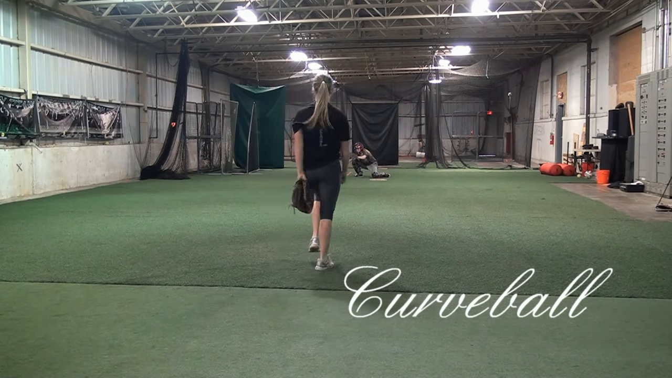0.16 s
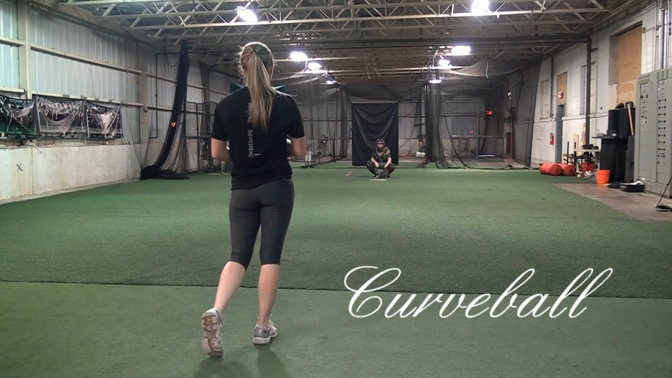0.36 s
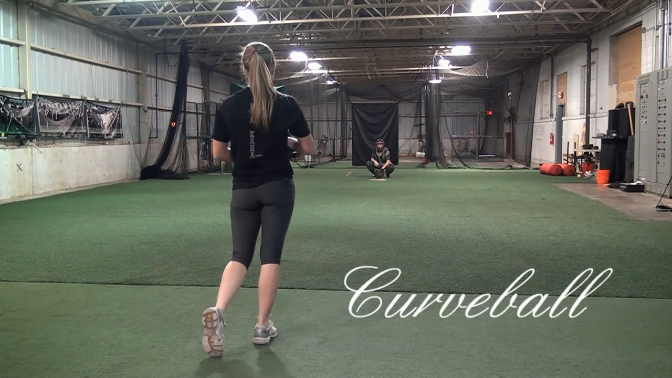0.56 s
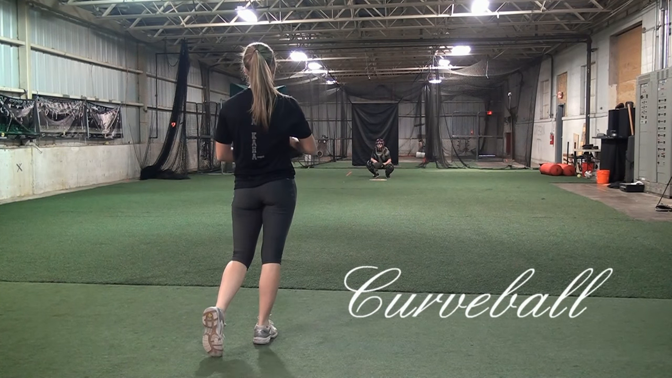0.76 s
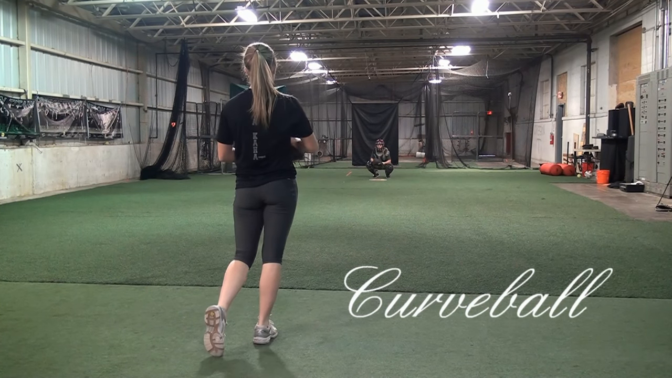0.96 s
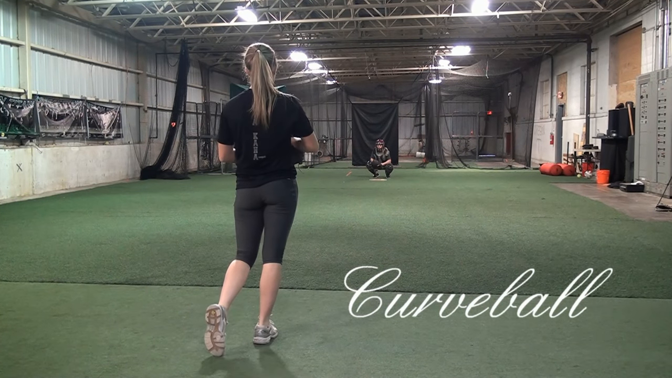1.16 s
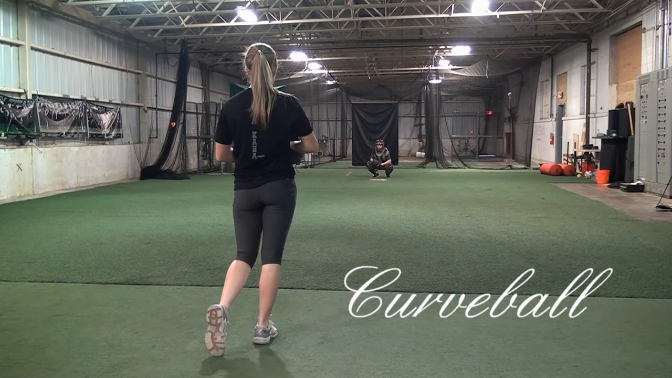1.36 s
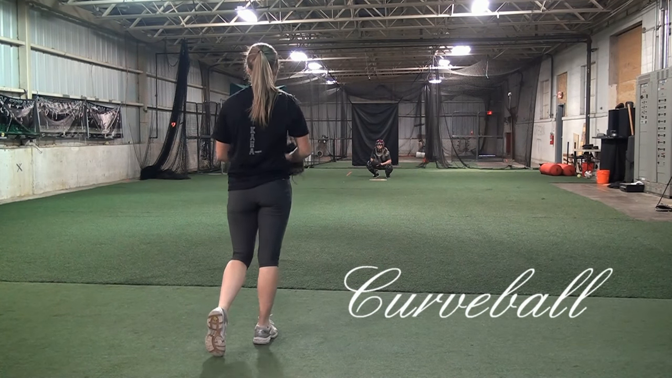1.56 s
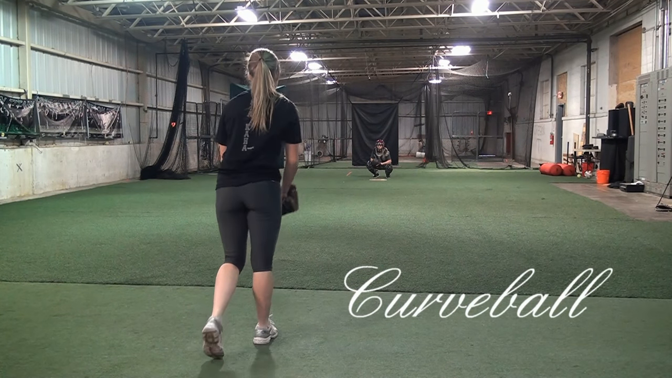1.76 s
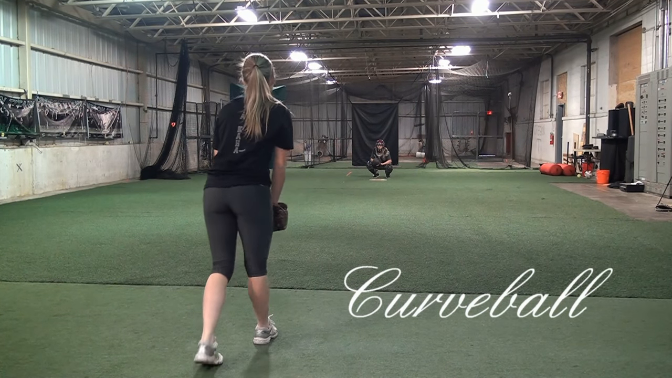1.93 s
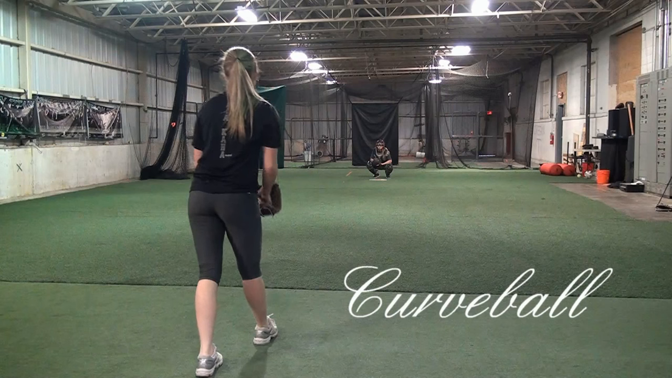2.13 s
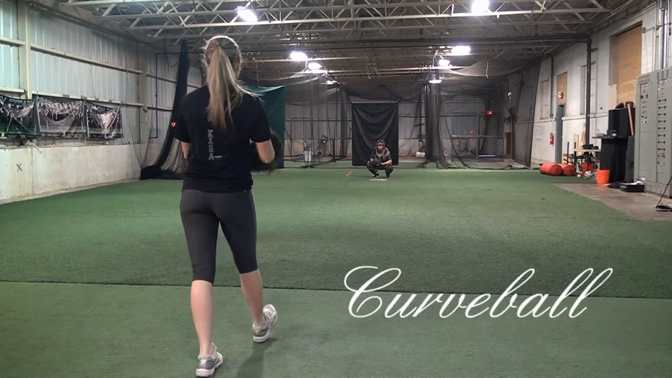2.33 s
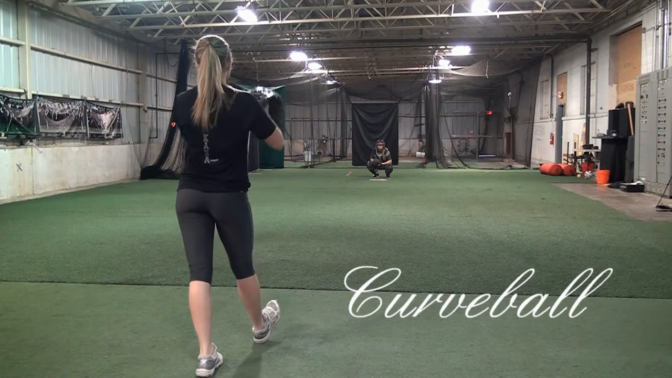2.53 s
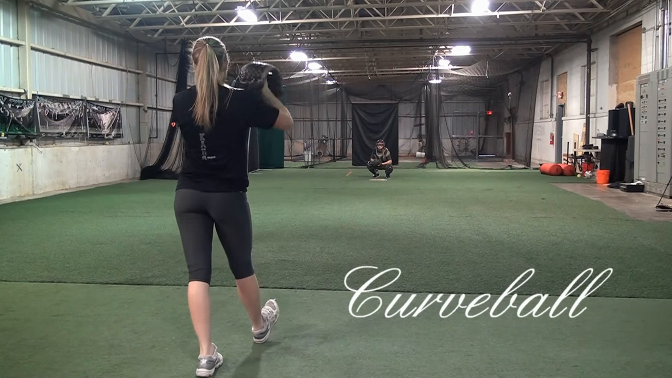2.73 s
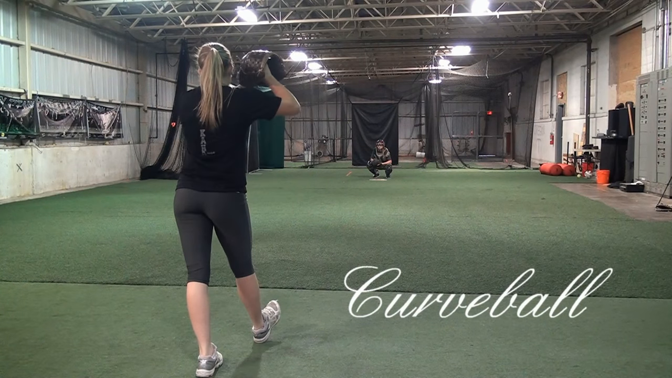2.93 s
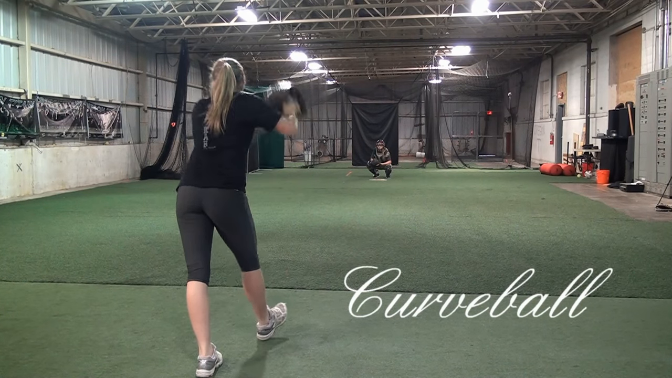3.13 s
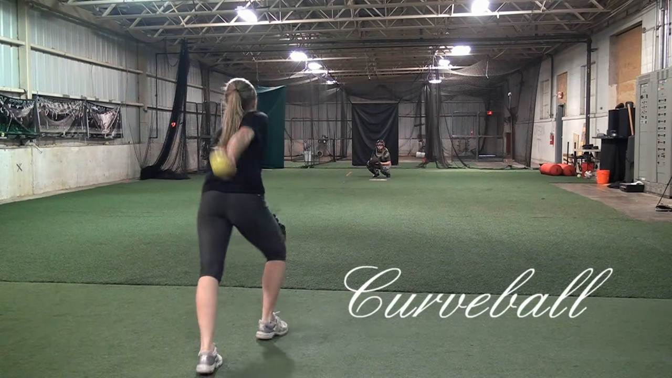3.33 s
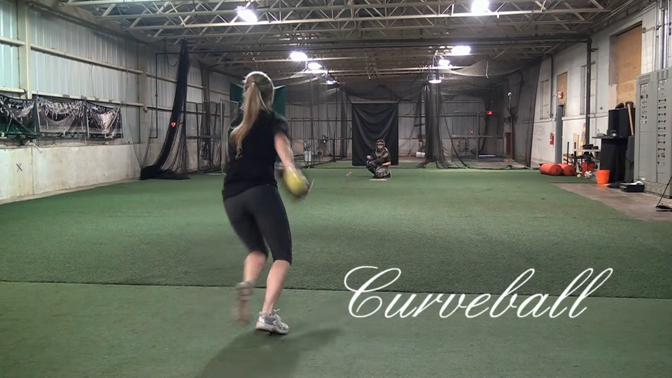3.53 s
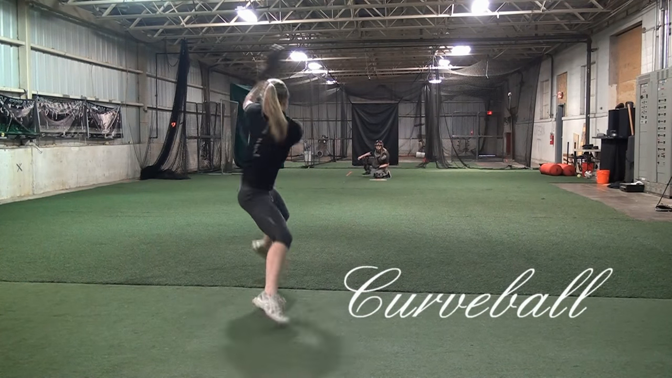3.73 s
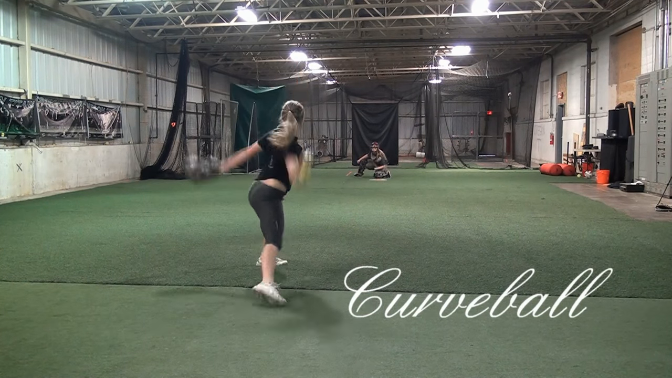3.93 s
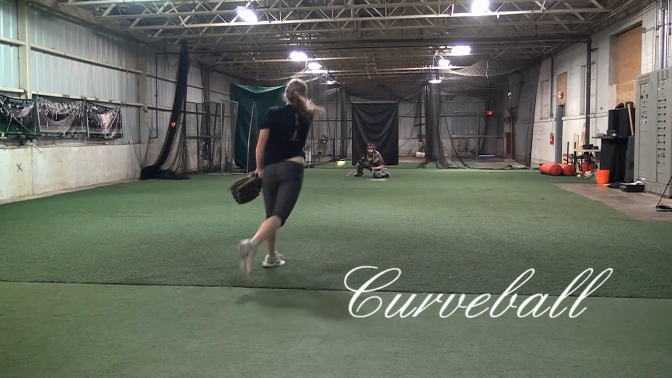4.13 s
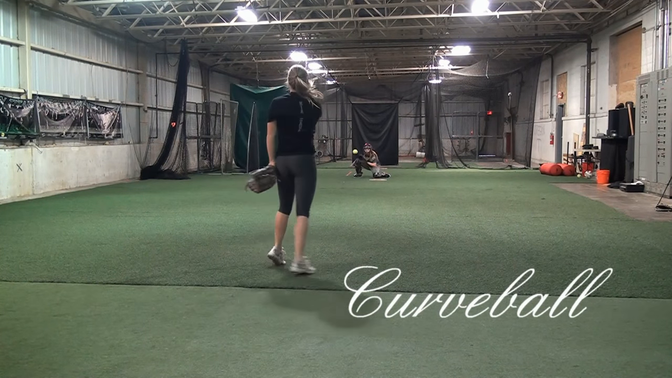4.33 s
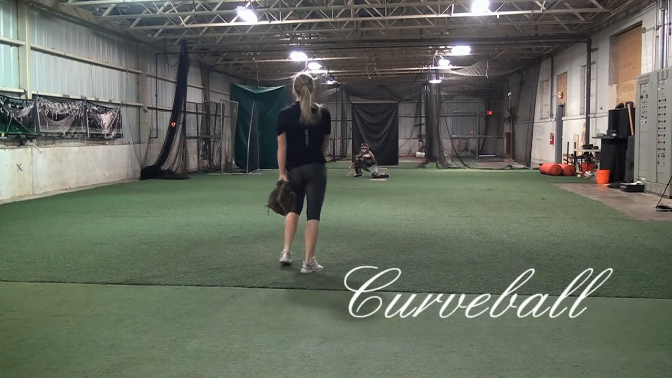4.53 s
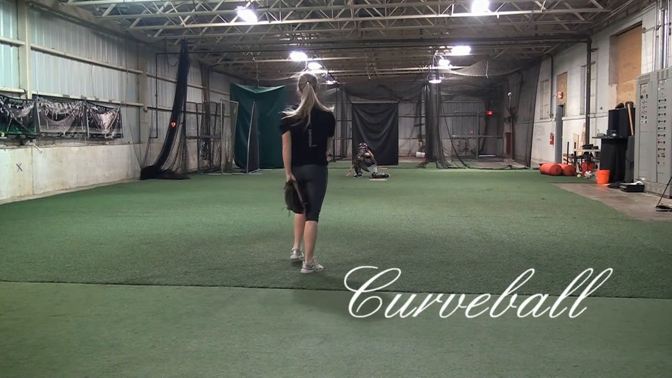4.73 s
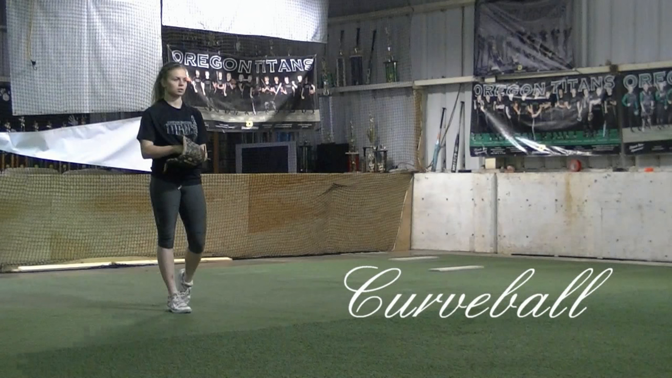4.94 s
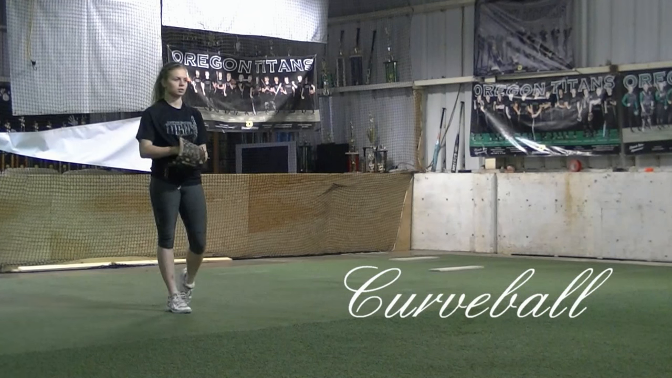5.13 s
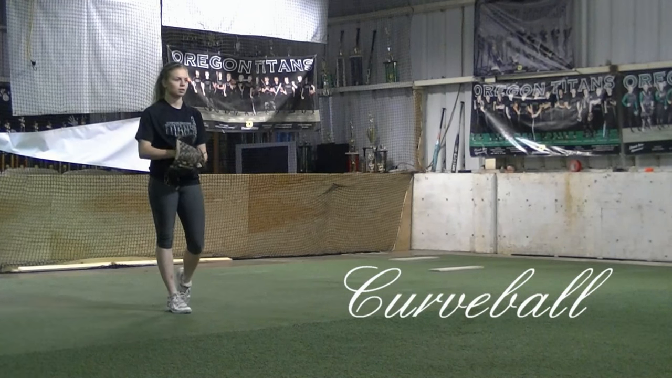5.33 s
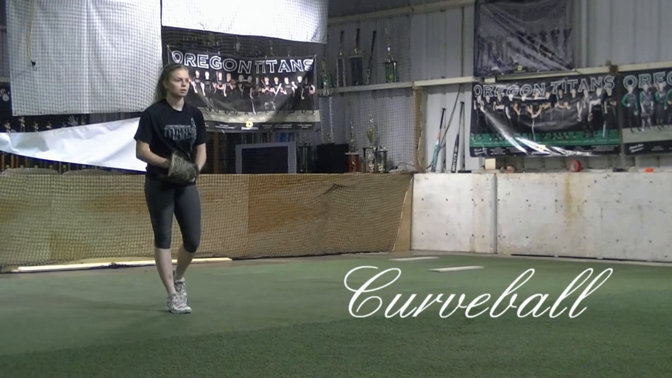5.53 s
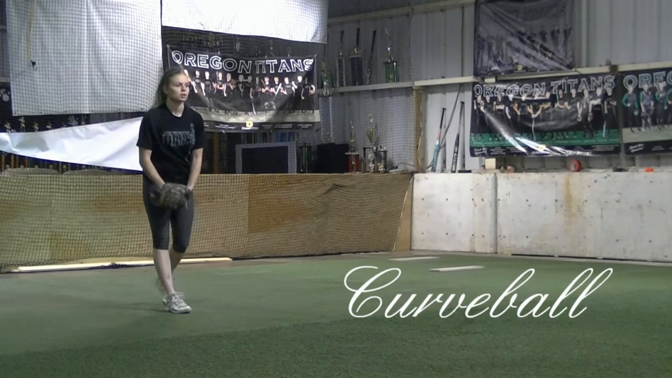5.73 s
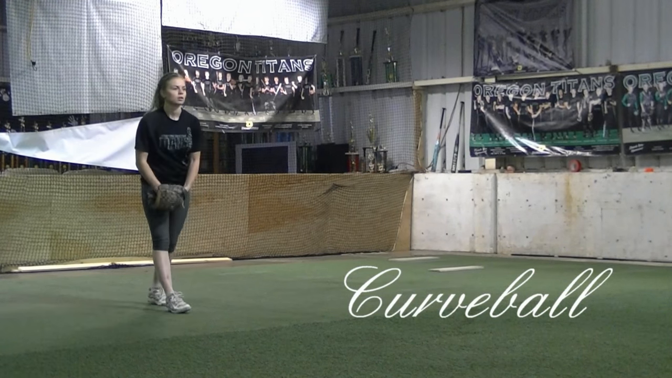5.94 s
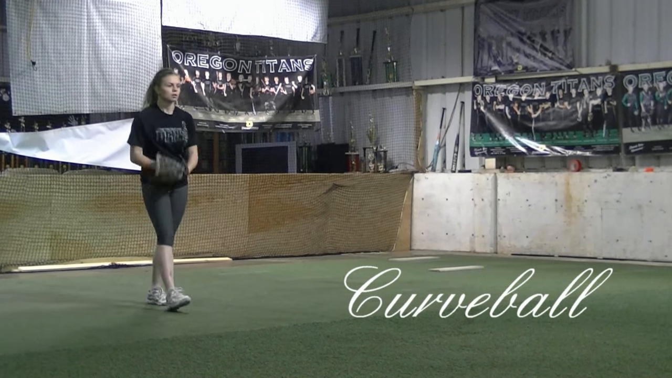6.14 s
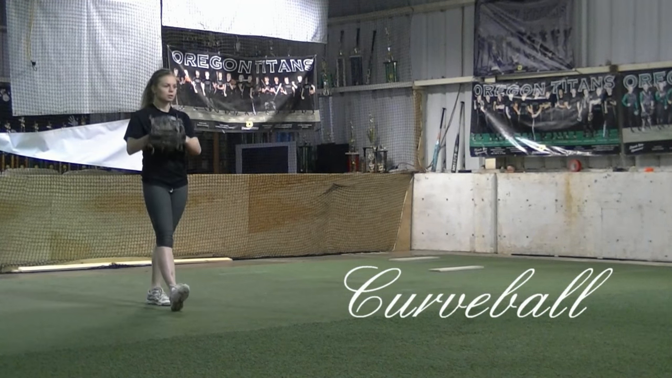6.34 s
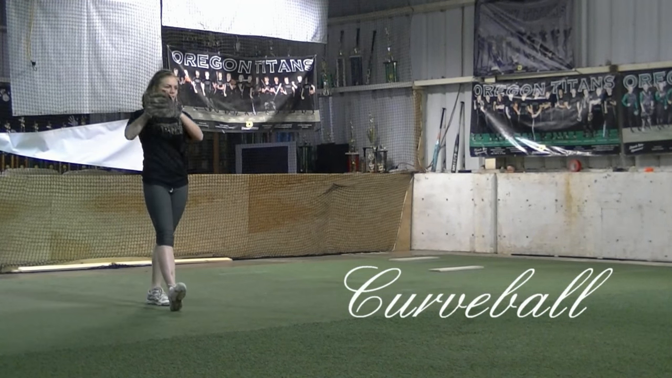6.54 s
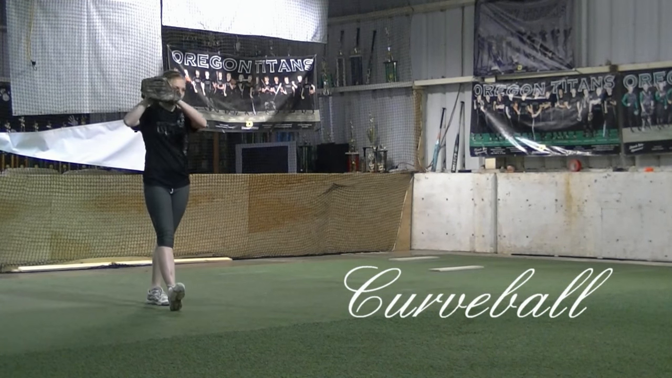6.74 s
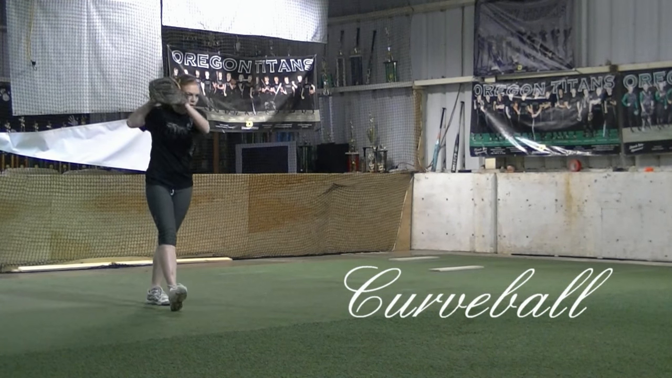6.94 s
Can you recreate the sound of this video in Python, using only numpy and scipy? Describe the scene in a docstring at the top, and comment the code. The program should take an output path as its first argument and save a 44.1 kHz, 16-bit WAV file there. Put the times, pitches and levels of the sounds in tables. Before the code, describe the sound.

In a buzzing indoor training hall, a thigh slap and hard mitt pop echo after scuffing steps, before the sound drops to faint hum.

```python
"""Leather smacks (ball in mitt, glove on thigh) of softball pitching in a long steel-roofed training hall.
Each smack is a short resonant noise burst, a damped low swing and a reverberant wash, flattened at full scale.
Swelling noise makes the scuffs on turf and a faint far ringing; lamp ballasts buzz as mains harmonics over hiss.
The scene is heard first in near mono from behind the pitcher, then, much quieter and in stereo, from the side."""
import sys
import numpy as np
from scipy import signal
from scipy.fft import rfft, irfft, next_fast_len
from scipy.io import wavfile

SR = 44100
rng = np.random.default_rng(int(sys.argv[2]) if len(sys.argv) > 2 else 0)


def to_wav(s):
    """Save 16-bit WAV."""
    ch = np.atleast_2d(s).T  # columns
    pcm = np.round(np.clip(ch, -1, 1) * 32767)  # PCM
    wavfile.write(sys.argv[1], SR, pcm.astype(np.int16))


N = 312669
TIME = np.arange(N) / SR  # [s]
# spectrum of struck leather: (frequency [Hz], relative level per Hz [dB])
LEATHER = [(60, -98), (150, -76.5), (380, -60.5), (700, -55.5), (1100, -50), (1800, -51), (3200, -48.5),
           (4600, -54.5), (6200, -59.5), (9000, -69.5), (15000, -78.5)]
# resonances and hollows of the leather: (frequency [Hz], width [Hz], level [dB])
POCKET = [(625, 80, -3.5), (910, 200, 7), (1070, 120, -5.5), (1360, 430, 6.5), (2506, 380, 5.5),
          (2900, 170, -1.5), (3400, 330, 3.5), (3900, 340, -1.5), (4420, 350, 3.5)]


def undb(db):
    """Amplitude gain is ten to the power of a twentieth of the level in decibels."""
    return 10 ** (np.asarray(db) / 20)


def curve(points, hz):
    """Linear interpolation of (frequency [Hz], value) points on a logarithmic frequency axis."""
    at, value = np.transpose(points)
    return np.interp(np.log(np.maximum(hz, 1)), np.log(at), value)


def shaped(points, resonances, hz):
    """Source and resonance: a broad spectrum carries bell-shaped peaks and dips, in dB."""
    bells = sum(db / (1 + (2 * (hz - centre) / width) ** 2) for centre, width, db in resonances)
    return curve(points, hz) + bells


def noise(db_at, size):
    """Filtered Gaussian noise whose power density in dB per Hz is the function db_at(Hz)."""
    fast = next_fast_len(size)
    gain = undb(db_at(np.fft.rfftfreq(fast, 1 / SR))) * np.sqrt(SR / 2)
    spectrum = rfft(rng.standard_normal(fast)) * gain
    return irfft(spectrum, fast)[:size]


def walk(rate, size):
    """Slow random modulation: independent values, rate per second, joined by straight lines."""
    at = np.arange(size) / SR * rate
    knots = size // 20
    return np.interp(at, np.arange(knots), rng.standard_normal(knots))


def add(track, s, sound):
    """Superposition: a sound is summed into the track from time s [s]."""
    start = int(round(s * SR))
    lo, hi = np.clip([start, start + len(sound)], 0, N)
    track[lo:hi] += sound[lo - start:hi - start]


def until(s, fade):
    """Linear gain ramp from 1 to 0, centred on time s [s] and lasting fade [s]."""
    return np.clip(.5 + (s - TIME) / fade, 0, 1)


def air(points, flutter_db=0.27):
    """Broadband turbulence: ventilation noise and hiss with a slight flutter in level."""
    return noise(lambda hz: curve(points, hz), N) * undb(flutter_db * walk(5.1, N))


def ballasts(strong, weak, waver, odd_db, scatter_db=2, count=85, size=4096):
    """Lamp cores vibrate in harmonics of twice the mains frequency; multipath makes them waver (mid, side)."""
    buzz_hz = 119.97
    db = curve(weak, buzz_hz * np.arange(1, count + 1)) + scatter_db * rng.standard_normal(count)
    db[::2] += odd_db  # odd and even partials differ in strength
    for hz, line_db in strong:
        db[int(round(hz / buzz_hz)) - 1] = line_db
    place = TIME * buzz_hz % 1 * size

    def play(phases):
        """Fourier synthesis: one cycle of summed partials, repeated."""
        cycle = irfft(np.r_[0, undb(db) * phases], size) * size / np.sqrt(2)
        return np.interp(place, np.arange(size + 1), np.r_[cycle, cycle[0]])

    steady, *drifting = np.exp(2j * np.pi * rng.random((3, count)))
    mid = play(steady) + waver * sum(walk(3, N) * play(phases) for phases in drifting)
    # a quarter-cycle shift: each partial reaches one microphone earlier than the other
    side = play(steady * 1j * rng.choice([-1, 1], count))
    return mid, side


def behind(whistle_hz=15734, whistle_db=-60):
    """Coherent and incoherent sound: mono hum, air and thin high whistle; unrelated noise in each channel."""
    # strong ballast partials: (nominal frequency [Hz], rms level [dB])
    strong_lines = [(600, -59), (720, -43.5), (840, -38.5), (1080, -56.5), (1200, -52), (1320, -49.5),
                    (1560, -57.5), (1800, -57.5), (2640, -58), (3120, -63), (3240, -57.5), (3600, -61),
                    (4440, -62.5), (6240, -70)]
    # weaker partials, before scatter and odd-partial offset: (frequency [Hz], rms level of each [dB])
    weak_lines = [(120, -83.5), (360, -64.5), (1700, -62), (2200, -66), (4800, -65.5), (5600, -72.5),
                  (7000, -71), (9000, -96.5)]
    # ventilation and hiss: (frequency [Hz], level per Hz [dB])
    air_points = [(10, -67), (30, -73.5), (100, -82.5), (220, -84.5), (600, -85.5), (850, -78),
                  (1050, -84.5), (1300, -83.5), (1800, -87), (4500, -88.5), (7000, -93), (10000, -94),
                  (15500, -94.5)]
    # faint unrelated noise in each channel, stronger in the bass: (frequency [Hz], level per Hz [dB])
    channel_noise_points = [(20, -88), (80, -92.5), (400, -107), (2000, -109), (15000, -109.5)]
    whistle = np.sqrt(2) * undb(whistle_db) * np.sin(2 * np.pi * whistle_hz * TIME)
    hum, _ = ballasts(strong_lines, weak_lines, waver=0.04, odd_db=0.5)
    channel_noise = np.array([noise(lambda hz: curve(channel_noise_points, hz), N) for _ in range(2)])
    return hum + air(air_points) + whistle + channel_noise


def beside():
    """Diffuse-field coherence: fainter hum and air, most alike in the bass, a little louder on the left."""
    # strong ballast partials, before the stereo mix: (nominal frequency [Hz], rms level [dB])
    strong_lines = [(480, -67.5), (720, -64.5), (840, -61.5), (1200, -66.5), (1320, -62.5), (1560, -66.5),
                    (1800, -68), (1920, -70.5), (2760, -71), (3000, -74), (3960, -80), (4080, -80),
                    (6600, -77), (6840, -82)]
    # weaker partials, before scatter, odd-partial offset and mix: (frequency [Hz], rms level of each [dB])
    weak_lines = [(120, -75.5), (240, -73.5), (600, -81), (2300, -76), (3400, -85.5), (5000, -85.5),
                  (7000, -96), (10000, -102.5)]
    # ventilation and hiss, before the stereo mix: (frequency [Hz], level per Hz [dB])
    air_points = [(25, -101), (60, -101), (120, -91), (280, -95), (500, -91.5), (1200, -95), (2000, -98),
                  (3200, -104), (5000, -108), (8000, -112), (13000, -118), (15500, -126)]
    # difference between the two microphones: (frequency [Hz], side minus mid [dB])
    diffuse_points = [(60, -9), (110, -15), (200, -2), (380, -2), (1300, -2.5), (4400, 0.5)]
    hums = ballasts(strong_lines, weak_lines, waver=0.17, odd_db=1.5)
    mid, side = (hum + air(air_points) for hum in hums)
    fast = next_fast_len(N)
    side_gain = undb(curve(diffuse_points, np.fft.rfftfreq(fast, 1 / SR)))
    side = irfft(rfft(side, fast) * side_gain, fast)[:N]
    return np.array([mid + side, mid - side]) * undb([[.7], [-.7]])


def far_ring(s=0.694, rise_s=0.099, fall_s=0.15):
    """Resonance at a distance: something far down the hall rings faintly as one swell of reverberation."""
    # broad spectrum of the ringing: (frequency [Hz], level per Hz at the peak of the swell [dB])
    far_points = [(150, -100), (600, -82), (1400, -78), (2800, -79.5), (4500, -83), (7000, -96),
                  (15000, -112)]
    # its resonances: (frequency [Hz], width [Hz], level [dB])
    far_peaks = [(1330, 90, 4.5), (2020, 51, 11.5), (2493, 120, 13.5)]
    rising = np.exp(-((TIME - s) / rise_s) ** 2)
    falling = np.exp(-np.abs(TIME - s) / fall_s)
    swell = np.where(TIME < s, rising, falling)
    return swell * noise(lambda hz: shaped(far_points, far_peaks, hz), N)


def rubs(events, spectrum, grain_db=1.0, low_cut_hz=150, fall_per_rise=1.4):
    """Friction: swells of tiny catches in one material, dying away more slowly than they grow."""
    track = np.zeros(N)
    for s, rise, db in events:
        t = np.arange(SR // 2) / SR - 2 * rise
        swell = np.where(t < 0, np.exp(-(t / rise) ** 2), np.exp(-np.abs(t) / (fall_per_rise * rise)))
        rub = noise(lambda hz: curve(spectrum, hz) - 10 * np.log10(1 + (low_cut_hz / (hz + 1)) ** 2), len(t))
        grain = undb(db + grain_db * walk(700, len(t)))
        add(track, s - 2 * rise, rub * swell * grain)
    return track


def scuffs(room_db=-15, room_t60=1.0, room_top_hz=4500):
    """Friction and convolution: soles drag, feet land and cloth swishes, each with a dull exponential tail."""
    # soles pushing off, landing and dragging on the turf: (time [s], rise [s], level [dB])
    drag_events = [(1.9, .018, -22), (2.49, 0.021, -17.5), (3.425, .03, -2), (3.52, 0.018, -5.5),
                   (3.7, 0.054, -17), (3.785, .03, -9), (3.898, 0.019, 0), (4.055, 0.03, -2),
                   (4.456, 0.027, -12)]
    # soft thuds of feet coming down and of the ball settling in the glove: (time [s], rise [s], level [dB])
    thud_events = [(1.88, 0.011, -22), (3.898, 0.014, 0.5), (5.5, 0.0072, -30), (6.365, 0.025, -31),
                   (6.62, .04, -35.5), (6.81, .03, -36)]
    # sleeves and leggings swishing: (time [s], rise [s], level [dB])
    swish_events = [(2.44, 0.03, -21), (3.211, .02, -17), (3.333, 0.034, -18), (3.98, .055, -7),
                    (4.08, .024, -2)]
    # spectra of dragging soles, of thuds and of cloth: (frequency [Hz], relative level per Hz [dB])
    turf_points = [(300, -77), (1300, -62), (4500, -67.5), (13000, -71)]
    tread_points = [(300, -67), (1300, -57), (4500, -73.5), (13000, -92.5)]
    cloth_points = [(300, -77.5), (1300, -61.5), (4500, -64.5), (13000, -80.5)]
    track = rubs(drag_events, turf_points) + rubs(thud_events, tread_points) + rubs(swish_events, cloth_points)
    t = np.arange(SR) / SR
    dull = noise(lambda hz: -10 * np.log10(1 + (hz / room_top_hz) ** 2), SR)
    tail = dull * np.exp(-np.log(1000) * t / room_t60)
    return track + undb(room_db) * signal.fftconvolve(track, tail / np.linalg.norm(tail))[:N]


def leather(hz):
    """Source and resonance: the spectrum of struck leather with its pocket."""
    return shaped(LEATHER, POCKET, hz)


def crack(db_at, db, length, snap_db, ring_s=0.00094, snap_hz=9000, low_cut_hz=200):
    """Impact radiation: direct noise as long as the contact [s], then a short ring; near, it keeps its treble."""
    t = np.arange(SR // 30) / SR
    burst = noise(lambda hz: db_at(hz) + snap_db * np.minimum(hz / snap_hz, 1), len(t))
    burst = burst * np.exp(-np.maximum(t - length, 0) / ring_s)
    # a hand-sized surface radiates little bass
    burst = signal.sosfilt(signal.butter(2, low_cut_hz, "high", fs=SR, output="sos"), burst)
    rms = np.sqrt(np.sum(burst ** 2) / SR / (length + ring_s / 2))
    return burst * undb(db) / rms


def thump(hz=75, decay_s=0.0071):
    """Damped oscillation: the padded hand recoils in one heavily damped low swing."""
    t = np.arange(SR // 10) / SR
    return np.sin(2 * np.pi * hz * t) * np.exp(-t / decay_s)


def hall(db_at, hold_s, t60_factor):
    """Reverberation: reflections thicken, hold, then die away at a rate set for each octave band."""
    # decay time of the hall, before the factor of each smack: (frequency [Hz], t60 [s])
    t60_points = [(150, 1.1), (400, 0.95), (1000, 0.86), (3000, 1.267), (6000, 0.65), (10000, 0.69),
                  (15000, 0.33)]
    lumpy_db = 1.1
    build_s, build_per_hold = .017, .15  # the longer the hall holds a smack, the more slowly it fills
    t = np.arange(SR) / SR
    wash = rfft(noise(db_at, SR) * undb(lumpy_db * walk(260, SR)))
    octave = np.log2(np.clip(np.fft.rfftfreq(SR, 1 / SR), 125, 16000) / 125)
    age = np.hypot(t, hold_s) - hold_s  # starts flat, so the level holds before it falls
    out = 0
    for k in range(8):
        t60 = t60_factor * curve(t60_points, 125 * 2 ** k)
        band = irfft(wash * np.maximum(1 - abs(octave - k), 0), SR)
        out = out + band * np.exp(-np.log(1000) * age / t60)
    return out * np.sqrt(1 - np.exp(-t / (build_s + build_per_hold * hold_s)))


def smacks(hollow_width=0.23, ring_width=0.14):
    """Impact and room response: crack, thump and the hall's answer; the opening one is cut off in mid-decay."""
    # leather smacks: (time [s], hall level [dB], hall hold [s], t60 factor [1], contact [s],
    # hollow of the pocket [Hz], its level [dB], strongest ring [Hz], its level [dB],
    # flat slap level [dB], tilt [dB per octave])
    smack_events = [(-.035, -0.2, 0.19, 0.99, 0.0023, 534, 6.5, 3550, 3, 4, 0.38),
                    (3.371, 1.0, 0.068, 0.77, 0.0036, 510, 7, 1350, 1, -3, -0.93),
                    (4.0963, 0.87, 0.062, 1.047, 0.0034, 527, 5, 858, 10, 1.5, 0.57),
                    (4.598, 2.6, 0.058, 1.036, 0.0023, 390, 6, 3260, 2.5, -7.5, 0.04)]
    # rebounds and single wall reflections of the smacks: (time [s], level [dB])
    rebound_events = [(.126, -13), (3.3789, -3.5), (3.383, -11.5), (3.404, -8), (4.1166, -14.5),
                      (4.6111, -7.5), (4.824, -17.5)]
    crack_db, thump_db = -5.5, -32.5
    hall_gap_s, first_cut_s, rebound_s = .004, 0.3866, .0012
    slap_hz, slap_width_hz = 2020, 1000  # the broad band that a flat hit brings out
    tilt_pivot_hz = 1500
    # a contact this long gives the crack this much treble; each halving adds more
    ref_contact_s, snap_db, snap_db_per_halving = 0.0033, 6.5, 4.5
    track = np.zeros(N)
    for (s, hall_db, hold_s, t60_factor, contact_s, hollow_hz, hollow_db,
         ring_hz, ring_db, slap_db, tilt_db) in smack_events:
        # how far the glove is open and where it is struck set resonances of its own
        own = [(hollow_hz, hollow_width * hollow_hz, hollow_db),
               (ring_hz, ring_width * ring_hz, ring_db),
               (slap_hz, slap_width_hz, slap_db)]
        halvings = np.log2(ref_contact_s / contact_s)

        def colour(hz):
            """Source and resonance: leather with this smack's own peaks and tilt."""
            return shaped(LEATHER, POCKET + own, hz) + tilt_db * np.log2((hz + 1) / tilt_pivot_hz)

        add(track, s, crack(colour, crack_db, contact_s, snap_db + snap_db_per_halving * halvings))
        add(track, s, undb(thump_db) * thump())
        add(track, s + hall_gap_s, undb(hall_db) * hall(colour, hold_s, t60_factor))
        if s < 0:
            track *= until(first_cut_s, 0.015)
    for s, db in rebound_events:
        add(track, s, crack(leather, db, rebound_s, snap_db=2.5, ring_s=0.0005))
    return track


def scene(side_cut_s=4.993):
    """Superposition: the pitch from behind, then a cut to the quiet side view, with scuffs across both."""
    first = until(side_cut_s, 0.012)
    return first * (smacks() + far_ring() + behind()) + (1 - first) * beside() + scuffs()


def record(dry, top_hz=15900):
    """Saturation and band limiting: the input stage flattens cracks at full scale; the top is cut steeply."""
    clipped = dry / (1 + dry ** 6) ** (1 / 6)
    return signal.sosfiltfilt(signal.ellip(10, .05, 50, top_hz, fs=SR, output="sos"), clipped)


dry = scene()
out = record(dry)
to_wav(out)
```